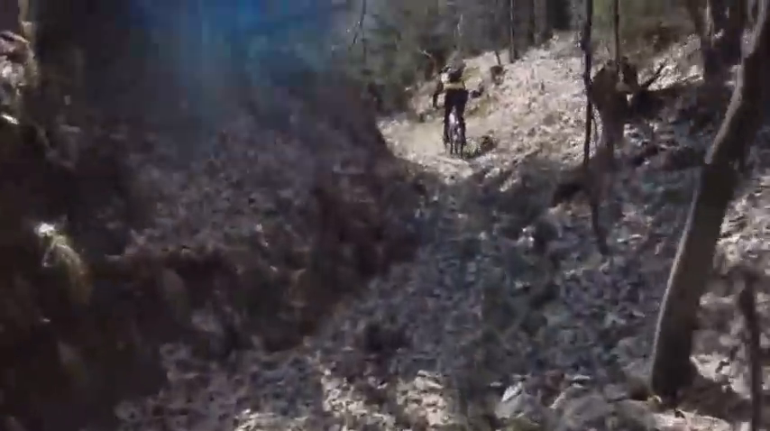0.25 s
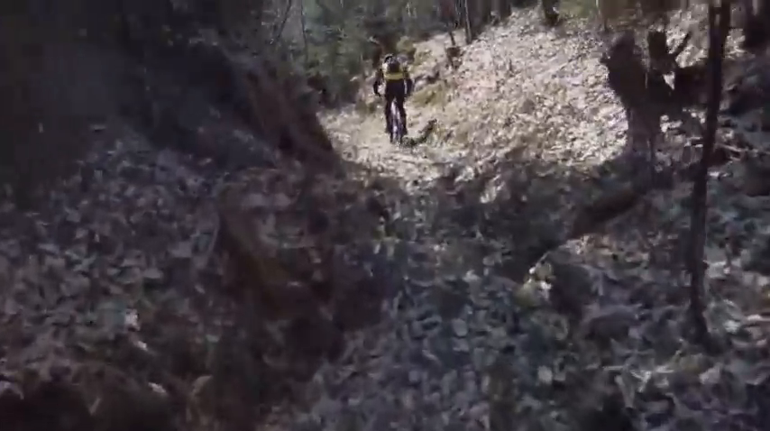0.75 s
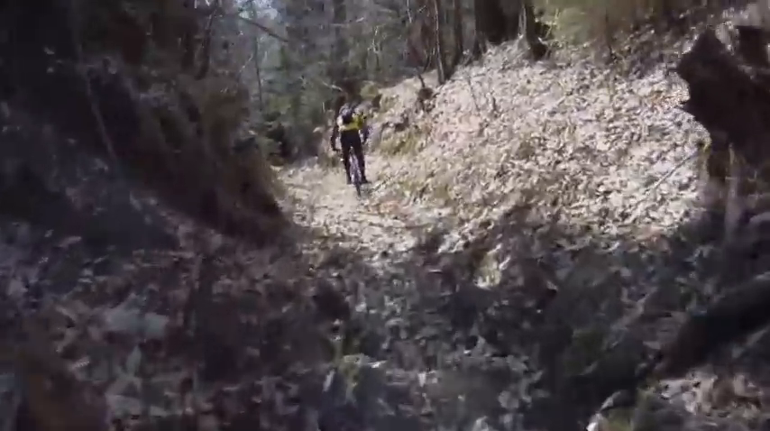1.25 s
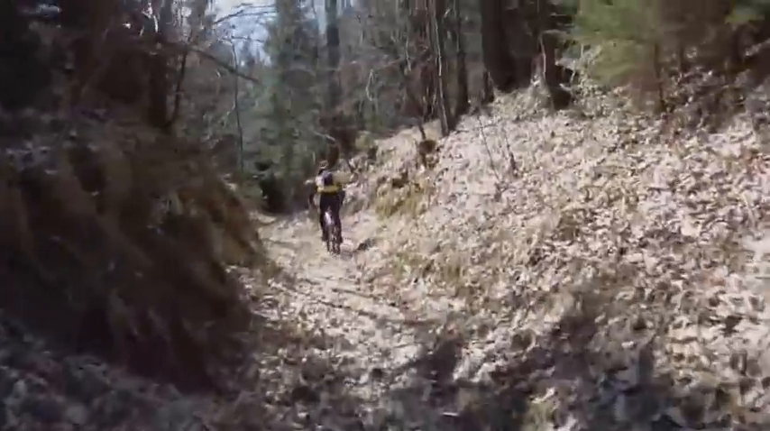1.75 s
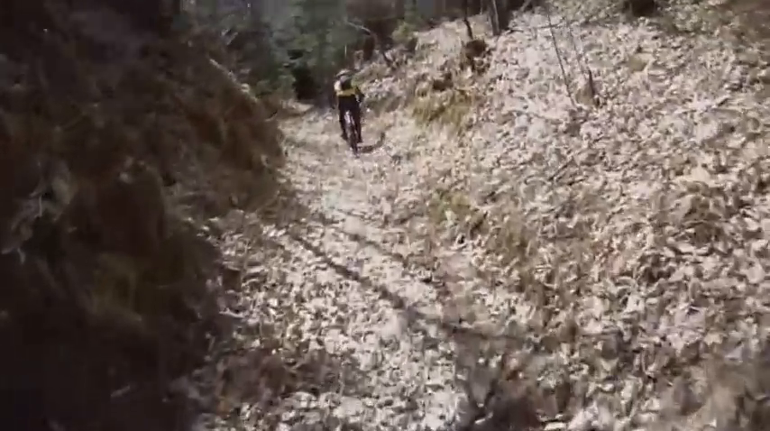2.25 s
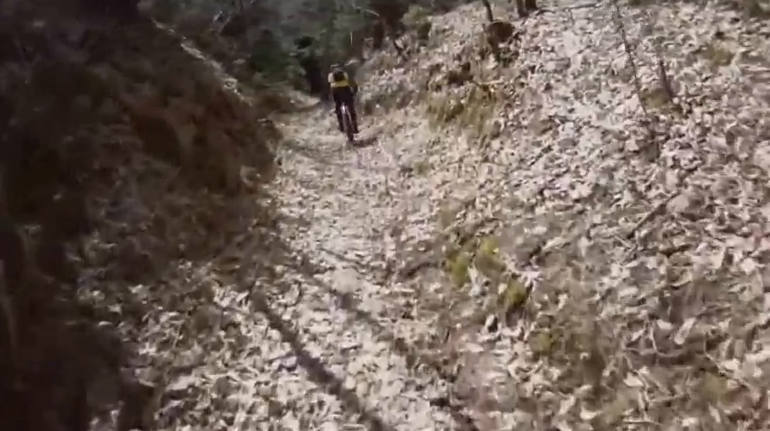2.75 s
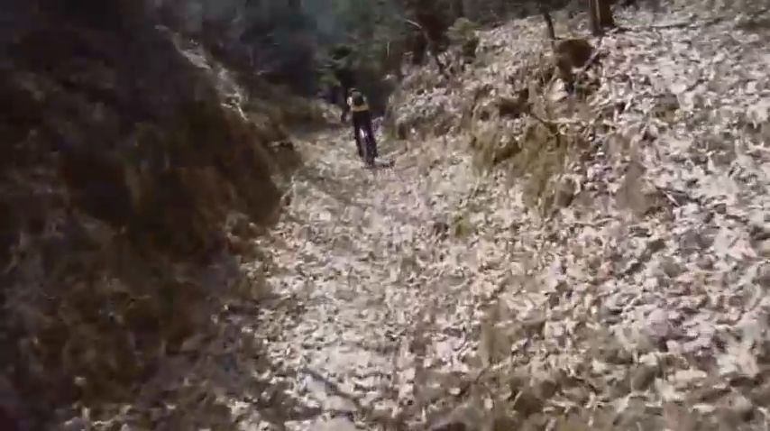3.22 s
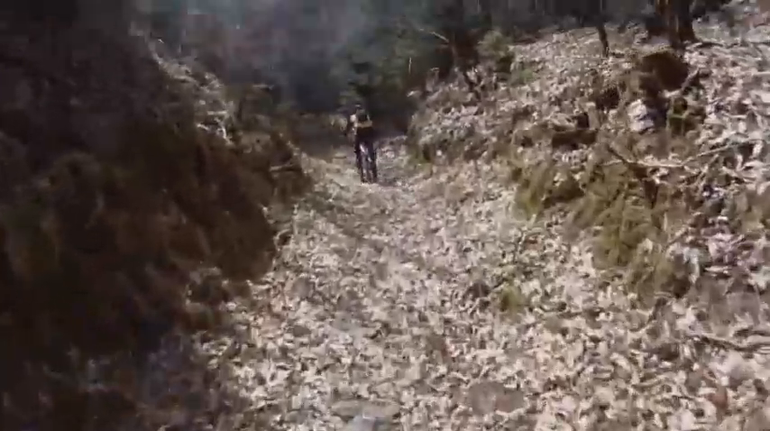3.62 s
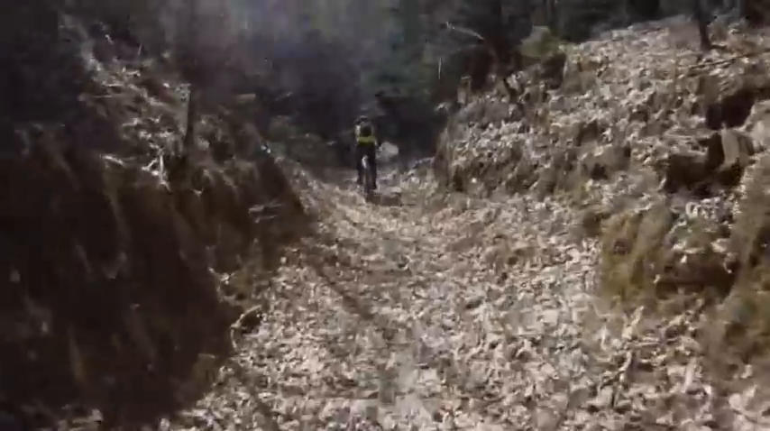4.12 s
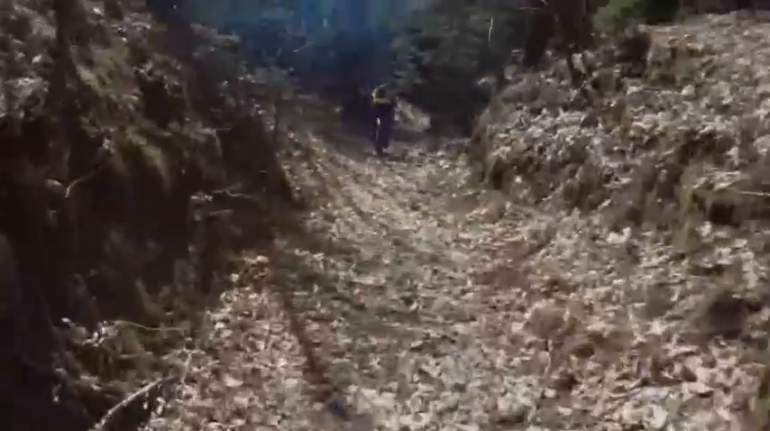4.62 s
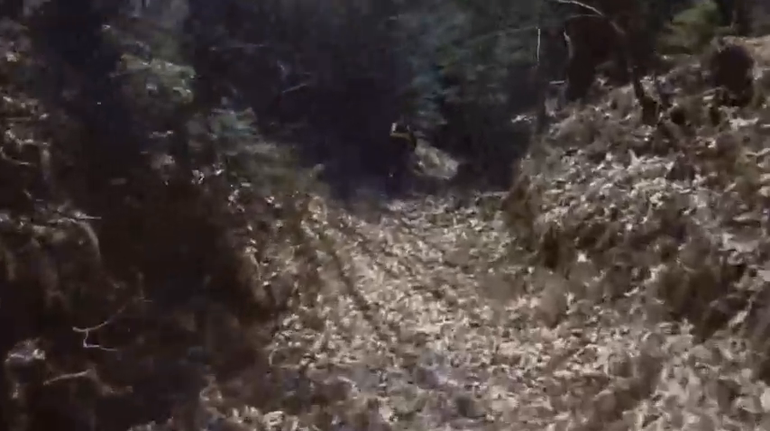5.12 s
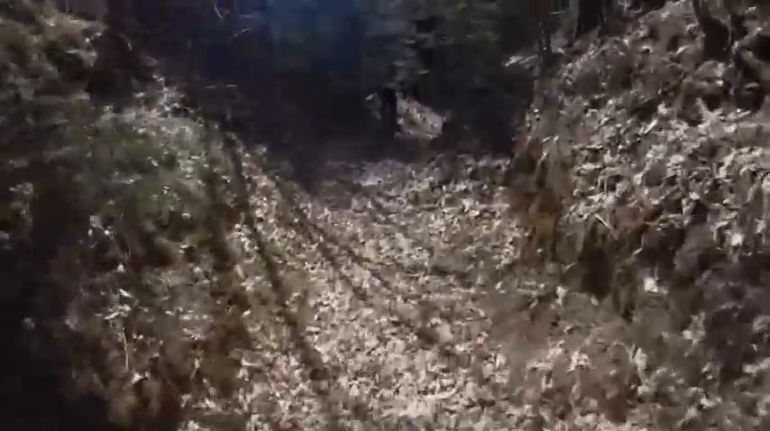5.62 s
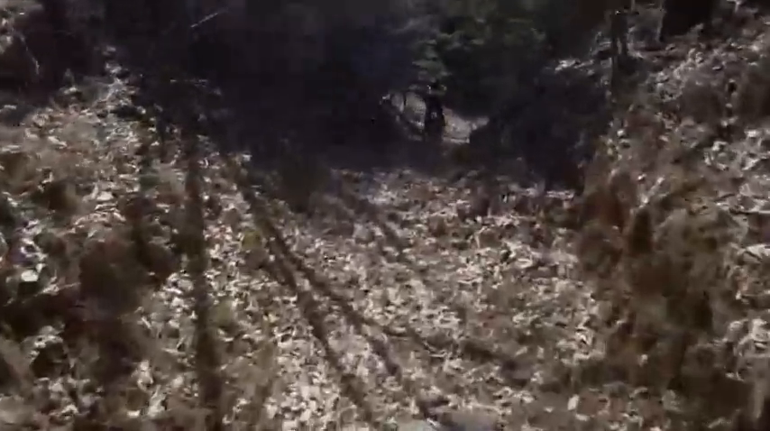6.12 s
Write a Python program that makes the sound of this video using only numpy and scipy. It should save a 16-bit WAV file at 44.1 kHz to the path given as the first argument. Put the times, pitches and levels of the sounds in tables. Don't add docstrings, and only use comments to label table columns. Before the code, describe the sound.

Mountain bike rolling downhill over dry leaves, soft crackling rustle, small rattles and faint high brake squeals, then growing wind buffeting and low thuds.

```python
import sys
import numpy as np
from scipy import signal
from scipy.fft import rfft, irfft
from scipy.io import wavfile
from scipy.ndimage import uniform_filter1d

SR = 44100
rng = np.random.default_rng(int(sys.argv[2]) if len(sys.argv) > 2 else 0)


def boost(x):
    u = np.asarray(x, float) / 20
    return 10 ** u


def bounce(signal):
    frames = np.transpose(np.atleast_2d(signal))
    limited = np.clip(frames, -1, 1)
    pcm = np.round(limited * 32767).astype(np.int16)
    wavfile.write(sys.argv[1], SR, pcm)


N = 280917

# t/s, rustle level/dB
LEAF_RUSTLE = [(0.0, -64), (0.1, -64.5), (0.55, -64), (1.04, -59.5), (1.19, -62.5), (1.88, -66),
               (2.11, -65.5), (2.27, -63), (3.23, -61.5), (3.64, -69.5), (3.89, -57), (4.2, -61),
               (4.75, -56), (4.98, -59), (5.55, -56.5), (5.71, -60), (5.98, -61), (6.37, -59.5)]
# t/s, length/s, level change/dB
LEAF_HEAPS = [(.16, 0.057, 5), (.36, 0.04, 3), (.42, 0.14, -4), (.56, 0.11, 2.5), (.97, 0.1, 1.5),
              (1.24, 0.12, -2), (2.6, 0.043, 2.5), (2.77, 0.073, -2), (2.93, .07, 1.5), (3.02, 0.089, 1.5),
              (3.28, 0.04, 3.5), (3.55, 0.11, 8.5), (3.9, 0.054, -2.5), (4.12, 0.067, -0.5),
              (4.38, 0.077, 6.5), (4.47, 0.053, -2), (4.62, 0.046, 3), (4.85, 0.058, 7.5), (4.9, 0.11, 0),
              (5.13, .06, -2), (5.24, 0.057, 4.5), (5.35, 0.064, 4.5), (5.58, 0.035, -0.5),
              (5.68, 0.037, 5), (5.79, 0.036, -5), (6.17, 0.078, -2), (6.23, 0.036, 8.5)]
# t/s, length/s, level change of the crisp top/dB
BRITTLE_STRETCHES = [
    (0.85, 0.47, 3.5),
    (1.2, 0.17, 4),
    (1.85, .15, 3.5),
    (2.5, 0.34, 5.5),
    (3.75, 0.19, 4),
    (4.7, 0.27, 3),
    (5.0, 0.24, -7),
    (5.33, 0.18, 1),
    (6.15, 0.38, 1),
]
# f/Hz, level/dB per Hz
CASE_COLOUR = [(600, -20.5), (900, -12), (1400, -8.5), (2000, -7), (2500, -5), (2750, -14.5), (3000, -8.5),
               (3700, -8), (4150, -5), (4550, -15.5), (5600, -15), (6800, -12), (9000, -16), (15800, -17)]
CRISP_DB, CRISP_FOLLOWS, CRISP_SPEED_LOSS = -67, 0.84, 0.055

# t/s, buffet level/dB
HEAD_WIND = [(0.0, -66), (0.5, -68), (0.6, -64.5), (1.15, -61), (1.4, -66), (1.78, -64), (1.83, -60),
             (2.06, -60), (2.12, -54.5), (2.3, -47), (2.68, -55), (2.8, -47.5), (3.7, -45), (4.1, -44),
             (4.7, -45), (5.15, -42), (5.65, -48), (6.37, -45.5)]
# t/s, length/s, level change/dB
SHORT_GUSTS = [(.2, 0.4, 2.5), (2.4, 0.25, 3.5), (2.9, 0.28, 0.5), (3.2, 0.23, -2.5), (3.5, 0.084, 1),
               (3.62, 0.36, -4), (3.9, 0.22, -1), (4.33, 0.25, 3.5), (4.78, 0.08, 2.5), (5.4, 0.18, 1.5),
               (5.72, 0.26, 2.5), (6.0, .16, -0.5)]
# t/s, length/s, level change/dB
SIDE_WIND = [(.38, 0.17, 5), (.95, 0.23, -11), (1.2, 0.5, 10), (1.55, 0.34, 6.5), (1.76, 0.3, 9.5),
             (2.05, 0.14, 7), (3.35, 0.11, 3), (3.7, .25, 2), (4.3, .25, -4.5), (4.8, 0.18, 3),
             (6.0, 0.25, 4)]
# f/Hz, level/dB per Hz
WIND_COLOUR = [(20, -17.5), (40, -8.5), (75, 3), (200, 4.5), (520, 3.5), (650, 1), (800, -7), (1300, -20.5),
               (2200, -40.5)]
DEEP_DB, DEEP_FOLLOWS = -57, 1

# t/s, peak level/dB
CABLE_RATTLES = [(0.0956, -44), (0.178, -42), (0.8869, -38), (1.2013, -37.5), (1.3828, -44), (2.085, -42.5),
                 (2.1784, -36.5), (2.6323, -43), (3.244, -42), (3.505, -43), (4.214, -36), (4.274, -35),
                 (4.6087, -36.5), (4.728, -35), (4.9966, -39), (5.5493, -35.5), (5.67, -37), (5.7096, -37),
                 (5.854, -44)]
# t/s, peak level/dB, f/Hz
PEBBLES = [(0.175, -43, 4060), (0.193, -44, 2300), (0.375, -46, 2370), (0.385, -48, 2400),
           (0.819, -42, 2840), (1.166, -39.5, 4100), (2.12, -46, 3700), (2.138, -48, 3900),
           (2.2614, -39.5, 3700), (2.2907, -41, 3700), (2.4206, -41.5, 3380), (4.354, -38, 3000),
           (4.8509, -31, 2210), (5.2022, -36.5, 3450), (5.769, -42.5, 4100), (5.8815, -38, 3640),
           (6.0516, -36.5, 3930)]
# t/s, peak level/dB
CHAIN_SLAPS = [(0.3207, -45), (0.5549, -47), (0.9273, -43.5), (0.9932, -40.5), (1.3637, -46), (1.4307, -49),
               (2.9416, -46.5), (3.1534, -41.5), (3.3059, -42), (3.3752, -43.5), (3.7485, -42),
               (5.1943, -36), (5.258, -46)]
# t/s, peak level/dB
STICK_KNOCKS = [(0.378, -49), (1.0735, -39.5), (1.134, -39), (2.1626, -38.5), (2.5474, -41), (2.759, -52),
                (3.034, -47), (3.4, -54), (3.666, -40.5), (3.7252, -38.5), (4.5692, -34), (4.853, -39.5),
                (5.062, -52), (5.9393, -38.5)]
# t/s, peak level/dB
LEAF_CRACKS = [(1.203, -46), (2.185, -44), (2.716, -52), (3.667, -60), (3.868, -46), (3.918, -44),
               (4.88, -52), (5.47, -45), (5.555, -37), (5.69, -57), (6.12, -50)]
# t/s, peak level/dB, f/Hz
TWIG_SNAPS = [(2.368, -49, 4000), (2.4857, -46, 2150), (2.608, -42, 2380), (3.4154, -46, 2360),
              (3.7875, -45, 2010), (3.9154, -39, 2140), (5.3478, -47, 3930), (5.6308, -40.5, 2420),
              (6.119, -60, 2060), (6.1407, -43.5, 2420), (6.2405, -39.5, 4100)]
CABLE_HZ, CHAIN_HZ, STICK_HZ, CRACK_HZ = 4050, 3330, 2350, 9000

# t/s, length/s, peak level/dB
REAR_SQUEALS = [
    (0.605, 0.057, -55),
    (0.72, 0.039, -52),
    (0.835, .035, -64),
    (0.965, .065, -59),
    (1.2, 0.071, -57),
    (4.155, 0.059, -57),
    (4.325, .075, -53),
    (4.91, 0.065, -52),
    (5.45, .06, -61),
    (5.58, .05, -67),
]
# t/s, length/s, peak level/dB
FRONT_SQUEALS = [(3.135, 0.055, -58), (3.28, 0.17, -57.5), (3.44, 0.12, -56), (3.78, 0.2, -64),
                 (3.95, 0.1, -61), (4.56, 0.041, -46.5), (4.615, 0.045, -58), (4.765, 0.13, -51),
                 (4.955, 0.076, -56), (5.03, 0.092, -57), (5.235, 0.06, -54), (5.32, .065, -63),
                 (5.925, 0.064, -52.5)]
# t/s, length/s, peak level/dB
PAD_SQUEALS = [
    (2.13, 0.081, -59),
    (2.175, .055, -55.5),
    (4.8, .05, -61),
    (6.03, 0.037, -55),
]
# ratio to its pitch, level/dB
REAR_TONES = [(.74, -7), (1, 0)]
FRONT_TONES = [(2 / 3, -10), (1, 0), (4 / 3, -2)]
PAD_TONES = [(.61, -14), (1, 0)]
FRONT_HZ, REAR_HZ, PAD_HZ = 11880, 15100, 9970

# t/s, peak level/dB, f/Hz
MOUNT_JOLTS = [(0.8195, -43, 281), (0.819, -36.5, 488), (0.931, -40.5, 560), (1.6, -43, 610),
               (2.097, -39, 450), (2.194, -36, 363), (2.28, -34, 330), (2.324, -33, 580),
               (2.801, -32.5, 524), (2.895, -26.5, 548), (2.979, -35, 550), (3.111, -31, 447),
               (3.34, -31, 518), (3.47, -29.5, 476), (3.87, -35, 320), (3.99, -31.5, 506),
               (4.149, -30, 370), (4.269, -27.5, 530), (4.395, -31, 374), (4.506, -37, 372),
               (4.974, -29, 428), (5.01, -30, 557), (5.095, -28.5, 460), (5.147, -30, 435),
               (5.227, -28, 423), (5.291, -27.5, 496), (5.473, -29.5, 490), (5.525, -34, 620),
               (5.757, -32.5, 564), (6.106, -30.5, 307)]
# t/s, peak level/dB, f/Hz
FLUNG_STONES = [(0.8208, -39, 2510), (0.9847, -46.5, 1070), (1.599, -80, 1640), (1.858, -54, 1670),
                (2.4219, -46.5, 1580), (2.7566, -46, 2070), (3.706, -42.5, 1650), (3.9207, -48, 1030),
                (4.585, -41, 1520), (4.8509, -58, 2130), (5.325, -44, 1080), (5.368, -56, 1500),
                (5.3725, -39, 1110), (5.385, -47, 1650), (5.3758, -37, 1210), (5.6321, -44, 2330),
                (6.071, -47, 1090), (6.2402, -49, 1100)]

# f/Hz, level/dB
TREBLE_SHELF = [(15270, 0), (15330, -7)]


def rms_one(x):
    return x / np.sqrt(np.mean(x ** 2) + 1e-20)


def in_time(rows, outside=None):
    s, *columns = np.transpose(rows)
    return [np.interp(np.arange(N) / SR, s, c, outside, outside) for c in columns]


def swells(rows):
    t = np.arange(0, N / SR + .002, .001)
    total = sum(db * np.sin(np.pi * np.clip((t - s) / length_s, 0, 1)) ** 2 for s, length_s, db in rows)
    return np.interp(np.arange(N) / SR, t, total)


def drift(rate_hz):
    r = np.exp(-2 * np.pi * rate_hz / SR)
    wander = signal.lfilter([1], [1, -2 * r, r * r], rng.standard_normal(N + SR))
    return rms_one(wander[SR:])


def grains(per_s, spread_db):
    sizes = boost(spread_db * np.minimum(rng.exponential(1, N), 5))
    signs = rng.choice([-1, 1], N)
    return rms_one(sizes * signs * (rng.random(N) < per_s / SR))


def band(x, low_hz, high_hz):
    return signal.sosfilt(signal.butter(2, [low_hz, high_hz], "band", fs=SR, output="sos"), x)


def colour(x, points, size=4096):
    hz, level_db = np.transpose(points)
    grid = np.maximum(np.arange(size // 2 + 1) * SR / size, 1)
    cepstrum = irfft(np.log(boost(np.interp(np.log(grid), np.log(hz), level_db))))
    cepstrum[1:size // 2] *= 2
    cepstrum[size // 2 + 1:] = 0
    impulse = irfft(np.exp(rfft(cepstrum)))
    impulse = impulse / np.sqrt(np.sum(impulse ** 2))
    return signal.fftconvolve(x, impulse)[:len(x)]


def leaves():
    (rustle_db,), (wind_db,) = in_time(LEAF_RUSTLE), in_time(HEAD_WIND)
    heaps_db = swells(LEAF_HEAPS)
    crisp_db = CRISP_DB + CRISP_FOLLOWS * (rustle_db - rustle_db.mean())
    crisp_db -= CRISP_SPEED_LOSS * (wind_db - wind_db.mean())
    crisp_db += swells(BRITTLE_STRETCHES) + 0.46 * heaps_db
    rustle_db = rustle_db + heaps_db

    clumps = drift(12)
    edges_hz = [600, 1700, 2750, 5000, 9000, 17000]
    parts = []
    for low_hz, high_hz in zip(edges_hz, edges_hz[1:]):
        crackle = grains(2500 * boost(3.0 * clumps), spread_db=5.5) + 1.6 * rng.standard_normal(N)
        flicker_db = 0.1 * clumps + 1.7 * drift(28)
        parts.append(band(crackle, low_hz, high_hz) * boost(flicker_db))
    big = colour(sum(parts[:3]), CASE_COLOUR)
    scraps = colour(sum(parts[3:]), CASE_COLOUR)
    big = big / np.std(band(big, 1000, 7500))
    scraps = scraps / np.std(band(scraps, 3340, 16000))
    return boost(rustle_db) * big + boost(crisp_db) * scraps


def wind():
    buffet_db, = in_time(HEAD_WIND)
    deep_db = DEEP_DB + DEEP_FOLLOWS * (buffet_db - buffet_db.mean()) + swells(SIDE_WIND)
    buffet_db = buffet_db + swells(SHORT_GUSTS)
    puffs = grains(900 * boost(2.2 * drift(30)), spread_db=2.6) + 0.6 * rng.standard_normal(N)
    high_pass = signal.butter(2, 300, "high", fs=SR, output="sos")
    low_pass = signal.butter(2, 280, fs=SR, output="sos")
    upper = signal.sosfilt(high_pass, colour(puffs, WIND_COLOUR))
    deep = signal.sosfilt(low_pass, colour(rng.standard_normal(N), WIND_COLOUR))
    flutter_db = 0.8 * drift(30) + 0.5 * drift(6)
    deep_db = deep_db + 0.53 * drift(4.8)
    return boost(buffet_db + flutter_db) * rms_one(upper) + boost(deep_db) * rms_one(deep)


def ground_rumble():
    return boost(-76.5) * rms_one(band(rng.standard_normal(N), 18, 70))


def knocks(events, t60, crisp_db, attack_s=0.0031):
    body, crisp = np.zeros(N + SR), np.zeros(N + SR)
    t = np.arange(4410) / SR
    noise = rng.standard_normal((len(events), 2, len(t)))
    for (s, peak_db, hz), (hiss, fizz) in zip(events, noise):
        decay = boost(peak_db - 60 * t / t60)
        burst = hiss * decay * (1 - np.exp(-t / attack_s))
        start = round(s * SR)
        at = slice(start, start + len(t))
        body[at] += band(burst, hz * 0.86, hz * 1.245) * np.sqrt(6000 / hz)
        body[at] += boost(2.5) * band(burst, hz * 0.58, hz * 2.15)
        crisp[at] += fizz * decay * (1 - np.exp(-t / 0.011)) * boost(crisp_db)
    return np.stack([body[:N], crisp[:N]])


def at_pitch(events, hz):
    return [(s, db, hz) for s, db in events]


def rattles():
    parts = knocks(at_pitch(CABLE_RATTLES, CABLE_HZ), t60=0.054, crisp_db=-19)
    parts += knocks(PEBBLES, t60=.035, crisp_db=-24, attack_s=.001)
    parts += knocks(at_pitch(CHAIN_SLAPS, CHAIN_HZ), t60=0.09, crisp_db=-22)
    parts += knocks(at_pitch(STICK_KNOCKS, STICK_HZ), t60=0.043, crisp_db=-17)
    parts += knocks(at_pitch(LEAF_CRACKS, CRACK_HZ), t60=0.037, crisp_db=-9)
    parts += knocks(TWIG_SNAPS, t60=0.065, crisp_db=-4.5)
    body, crisp = [colour(part, CASE_COLOUR) for part in parts]
    return boost(-10) * body + boost(8) * band(crisp, 4200, 12500)


def squeal(bursts, hz, partials, attack_s, fall_db, width_hz, steady, chatter_db):
    level = np.zeros(N)
    for s, length_s, db in bursts:
        shape = [(s, db - 20), (s + attack_s, db), (s + length_s, db - fall_db)]
        level += boost(in_time(shape, outside=-200)[0])
    level = uniform_filter1d(level, size=130) * boost(chatter_db * drift(36))
    grip = rms_one(steady + drift(width_hz)) + 1j * drift(width_hz)
    phase = 2 * np.pi * np.cumsum(hz * (1 + .002 * drift(6))) / SR
    tones = sum(boost(db) * np.exp(1j * ratio * phase) for ratio, db in partials)
    return level * np.real(grip * tones)


def brakes():
    total = squeal(REAR_SQUEALS, REAR_HZ, REAR_TONES, attack_s=0.017, fall_db=22,
                   width_hz=120, steady=1.1, chatter_db=-1.5)
    total += squeal(PAD_SQUEALS, PAD_HZ, PAD_TONES, attack_s=.025, fall_db=15,
                    width_hz=60, steady=1.5, chatter_db=1.5)
    total += squeal(FRONT_SQUEALS, FRONT_HZ, FRONT_TONES, attack_s=.02, fall_db=11,
                    width_hz=140, steady=1.7, chatter_db=2.0)
    return boost(-3.5) * total


def ring(x, hz, t60):
    r, w = boost(-60 / (t60 * SR)), 2 * np.pi * hz / SR
    return signal.lfilter([0, np.sin(w)], [1, -2 * r * np.cos(w), r * r], x)


def jolts(events, cycles, upper_db, bounce_db, gain_db):
    out, click = np.zeros(N + SR), np.zeros(2205)
    click[[0, 350]] = 1, boost(bounce_db)
    for s, peak_db, hz in events:
        contact = .4 * SR / hz
        at = round(s * SR + contact)
        touch = np.convolve(click, np.hanning(round(contact) + 2))[:len(click)] / (contact / 2)
        tones = ring(touch, hz, cycles / hz) + boost(upper_db) * ring(touch, 1.243 * hz, cycles / hz)
        out[at:at + len(click)] += boost(peak_db + gain_db) * tones
    return out[:N]


def mount_thuds():
    return jolts(MOUNT_JOLTS, cycles=15.0, upper_db=-12, bounce_db=-7, gain_db=-2.5)


def stone_ticks():
    return jolts(FLUNG_STONES, cycles=18.0, upper_db=0, bounce_db=-12, gain_db=0)


def scene():
    mono = leaves() + wind() + ground_rumble() + rattles()
    mono += brakes() + mount_thuds() + stone_ticks()
    return np.stack([mono, mono])


def roll_off(x):
    return signal.sosfilt(signal.butter(12, 15820, fs=SR, output="sos"), x)


def record(dry):
    hiss = boost(-75.5) * band(rng.standard_normal((2, N)), 6300, 14400)
    shelved = [colour(channel, TREBLE_SHELF) for channel in dry + hiss]
    treble_cut = signal.ellip(12, .5, 70, 15730, fs=SR, output="sos")
    mix = signal.sosfilt(treble_cut, shelved)
    return roll_off(mix)


dry = scene()
out = record(dry)
bounce(out)
```